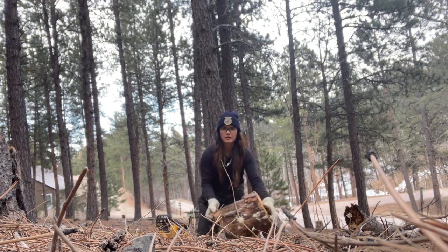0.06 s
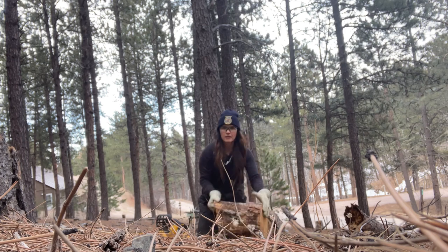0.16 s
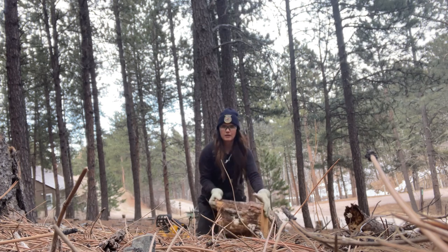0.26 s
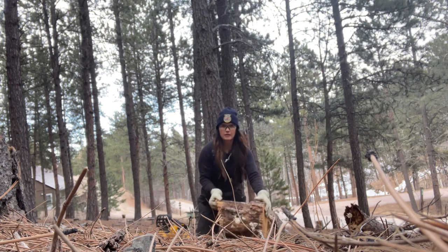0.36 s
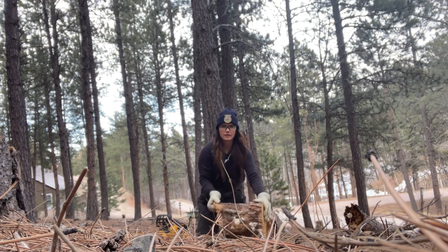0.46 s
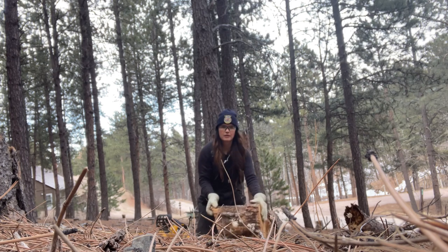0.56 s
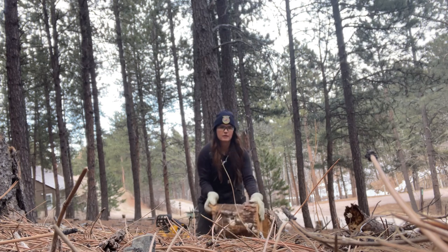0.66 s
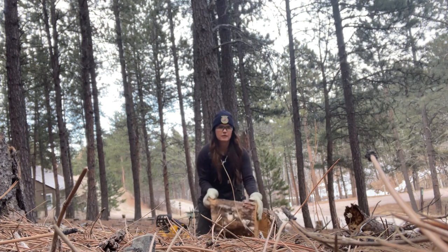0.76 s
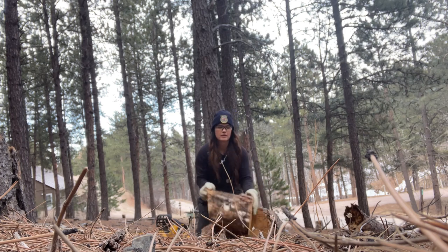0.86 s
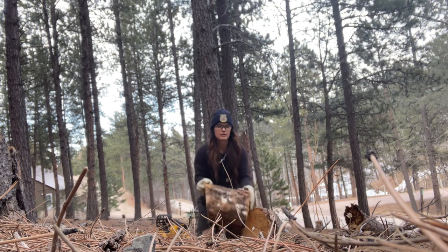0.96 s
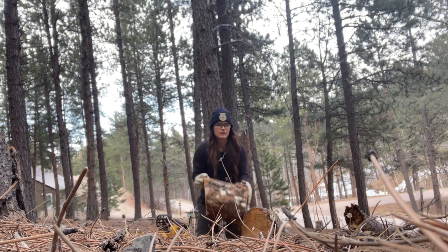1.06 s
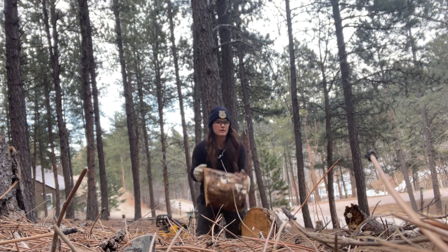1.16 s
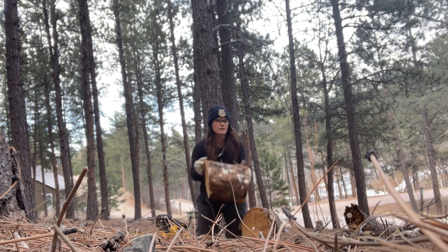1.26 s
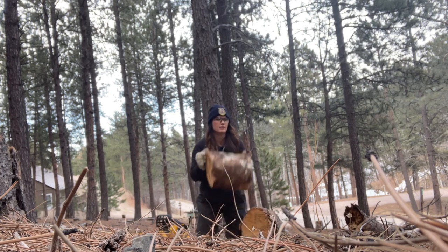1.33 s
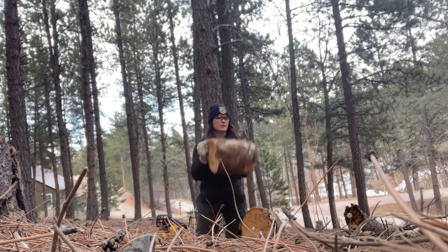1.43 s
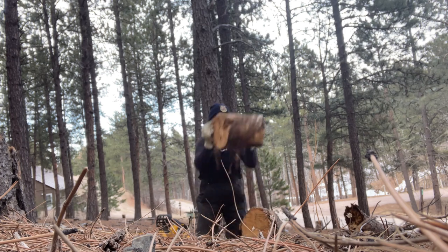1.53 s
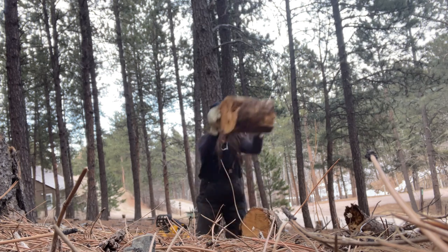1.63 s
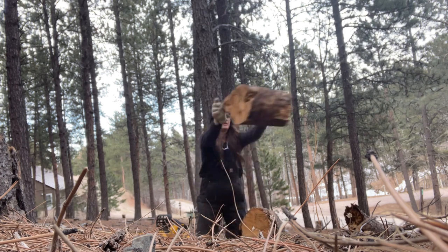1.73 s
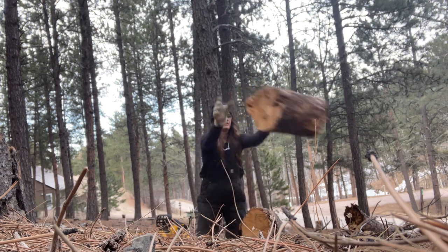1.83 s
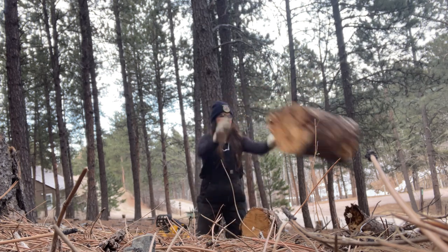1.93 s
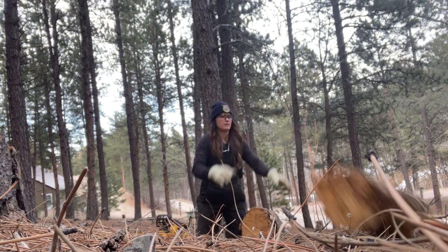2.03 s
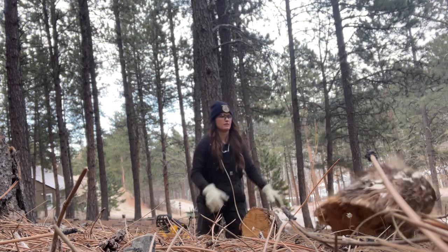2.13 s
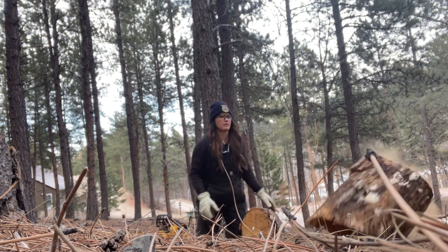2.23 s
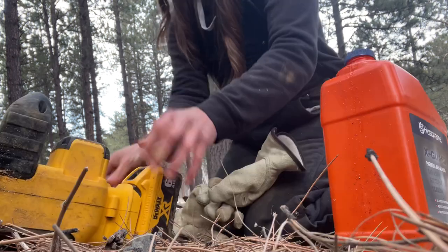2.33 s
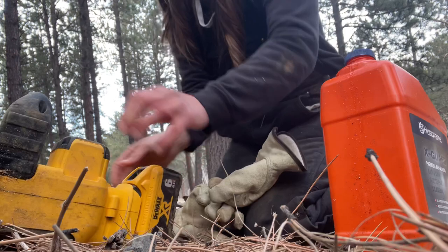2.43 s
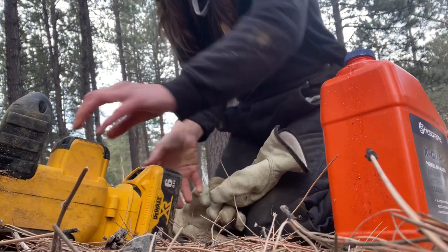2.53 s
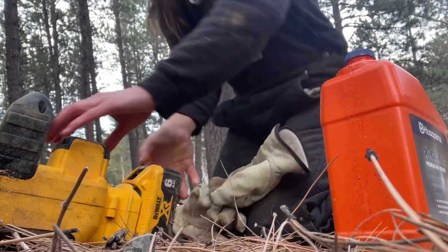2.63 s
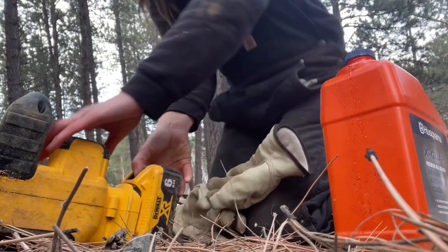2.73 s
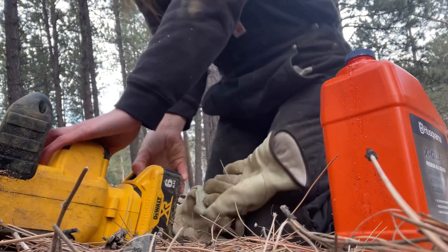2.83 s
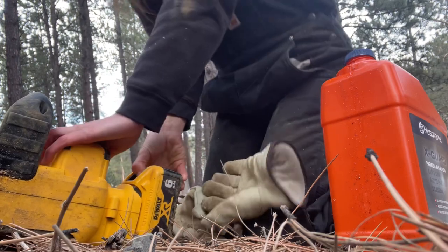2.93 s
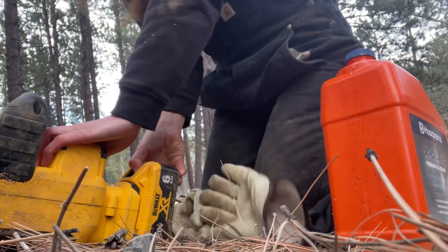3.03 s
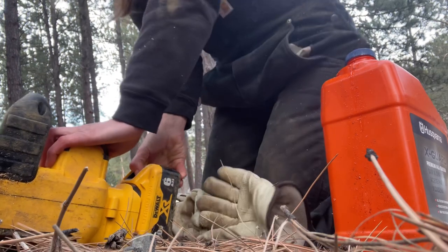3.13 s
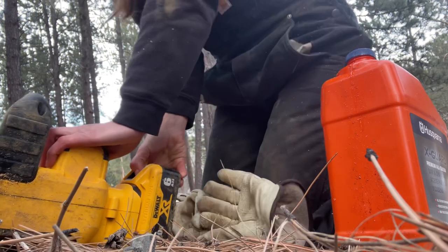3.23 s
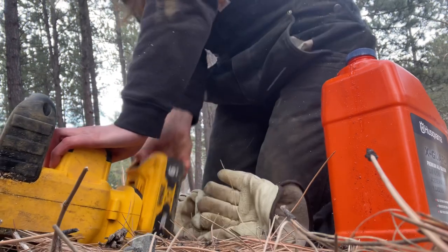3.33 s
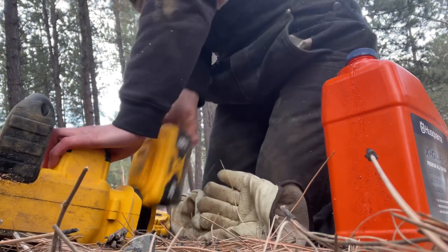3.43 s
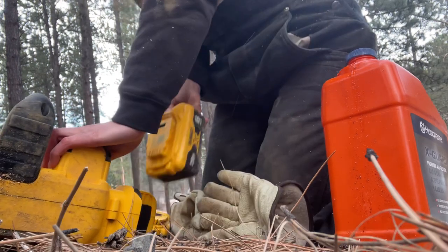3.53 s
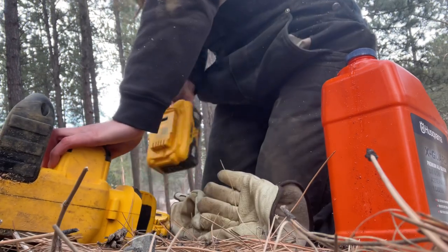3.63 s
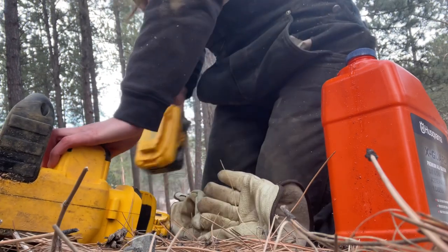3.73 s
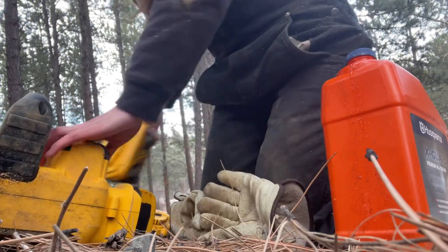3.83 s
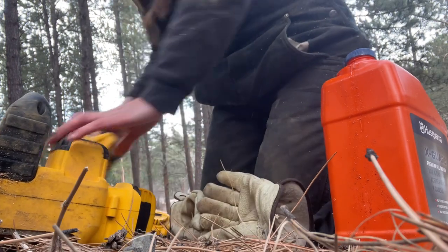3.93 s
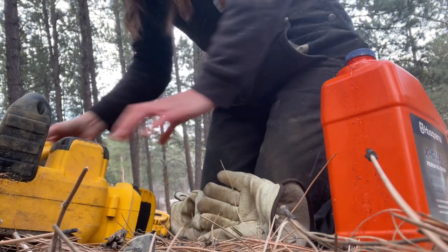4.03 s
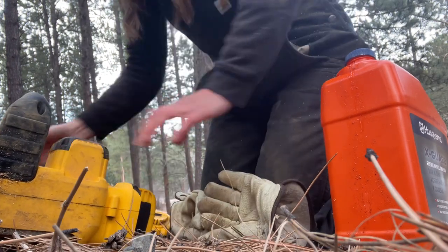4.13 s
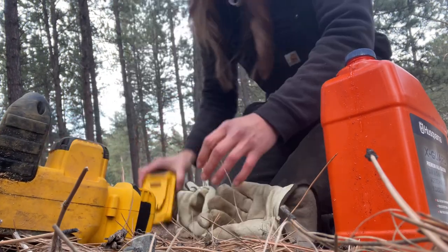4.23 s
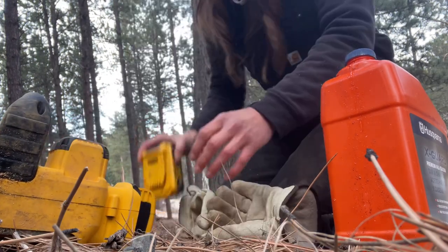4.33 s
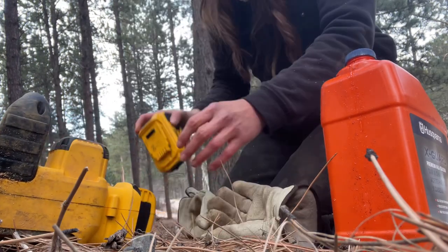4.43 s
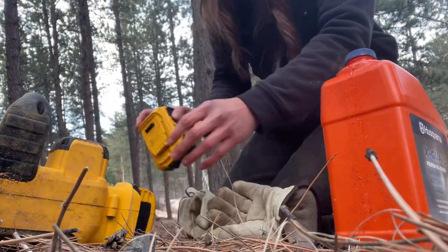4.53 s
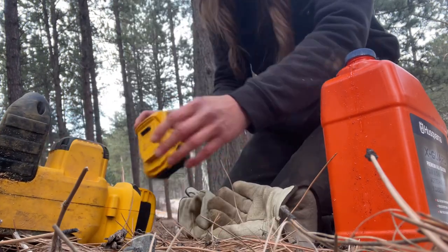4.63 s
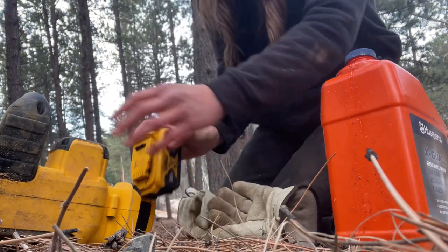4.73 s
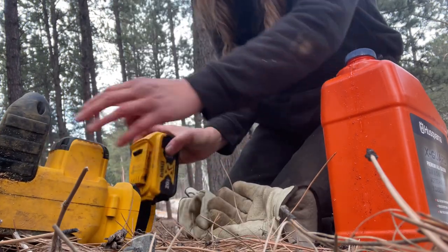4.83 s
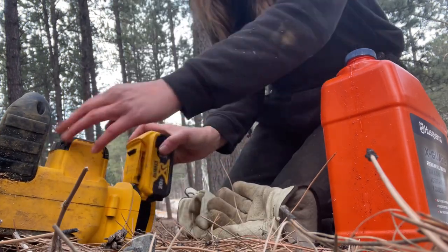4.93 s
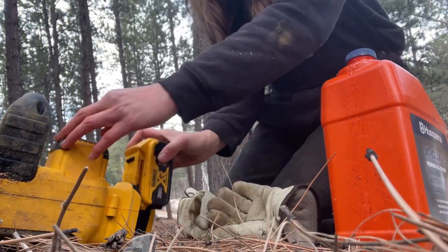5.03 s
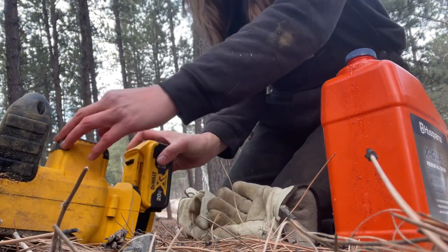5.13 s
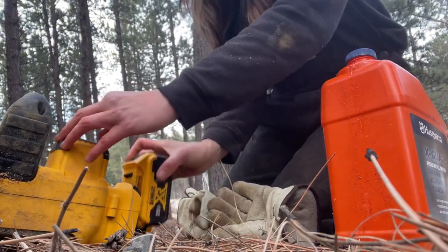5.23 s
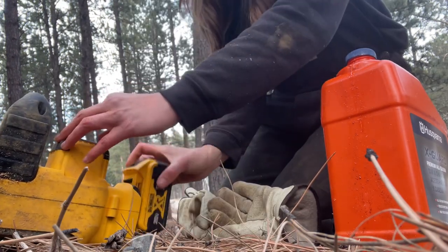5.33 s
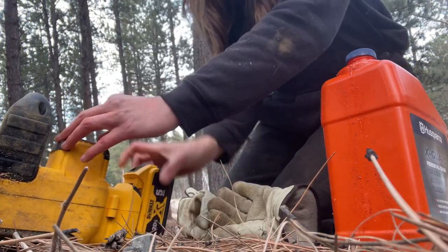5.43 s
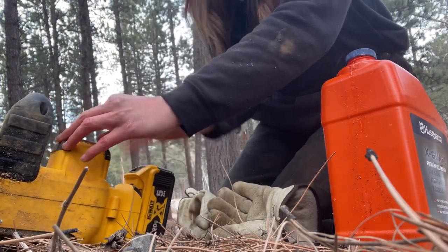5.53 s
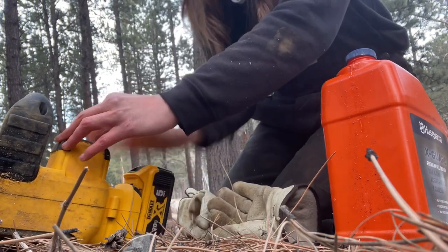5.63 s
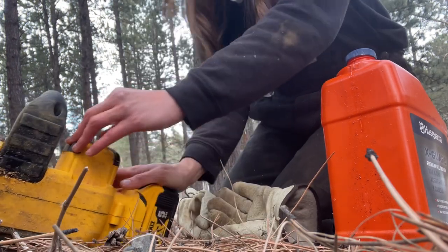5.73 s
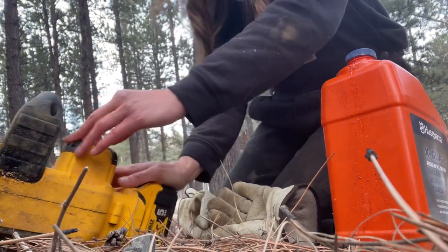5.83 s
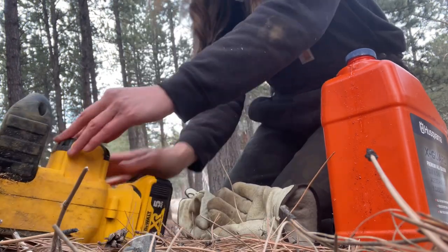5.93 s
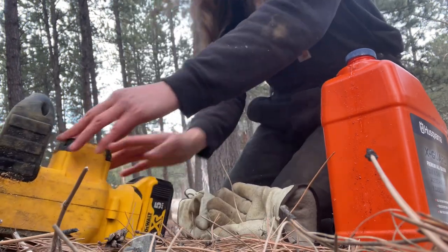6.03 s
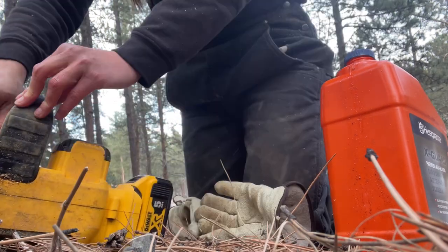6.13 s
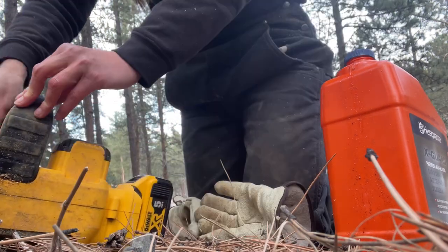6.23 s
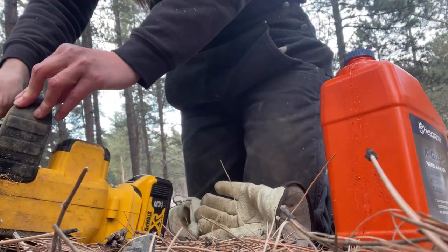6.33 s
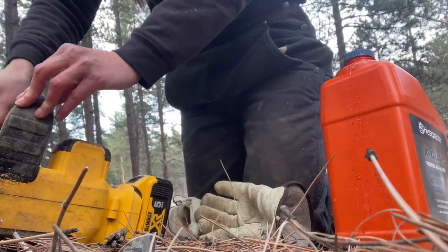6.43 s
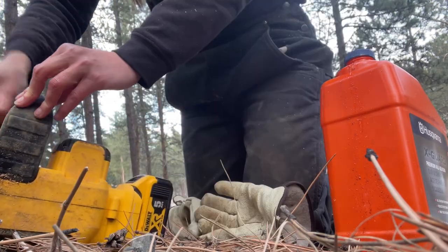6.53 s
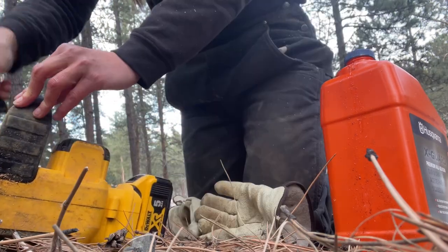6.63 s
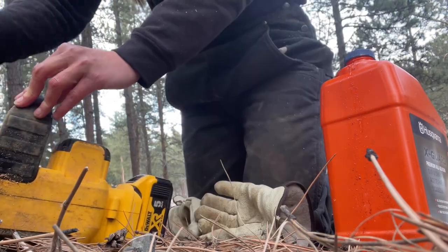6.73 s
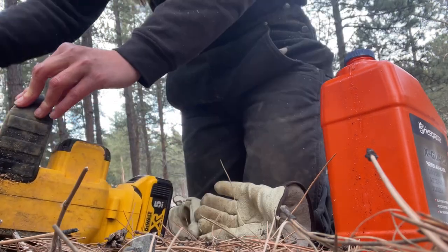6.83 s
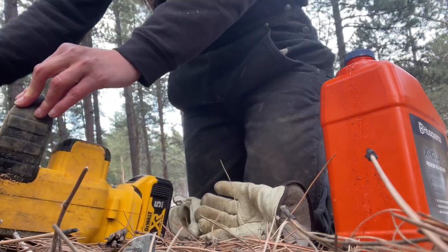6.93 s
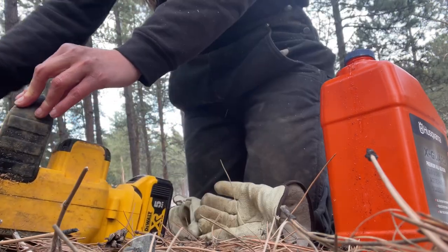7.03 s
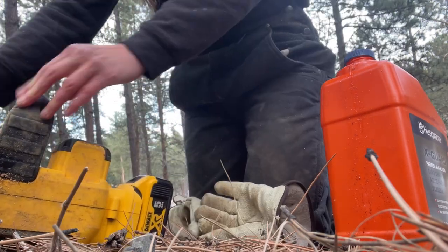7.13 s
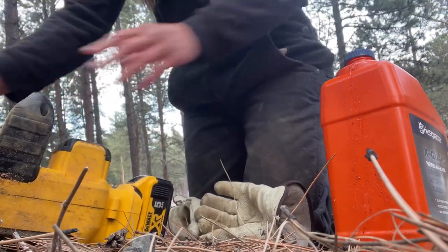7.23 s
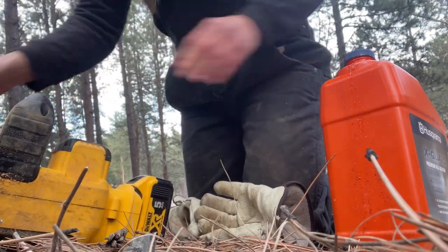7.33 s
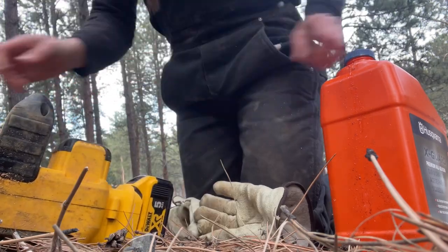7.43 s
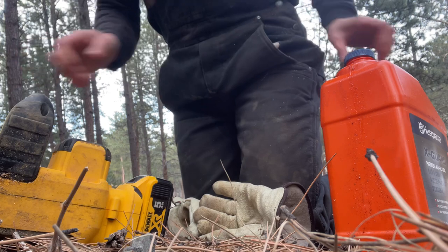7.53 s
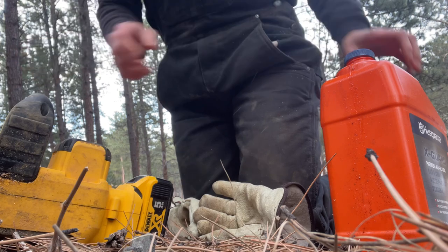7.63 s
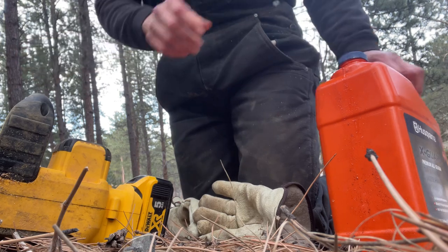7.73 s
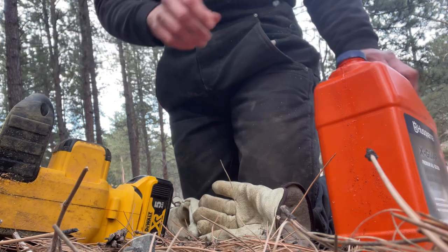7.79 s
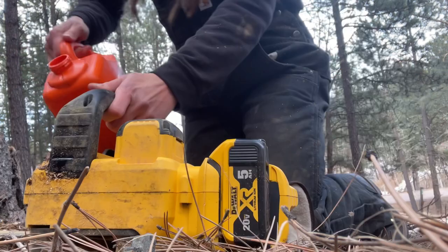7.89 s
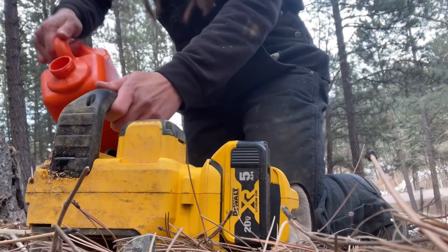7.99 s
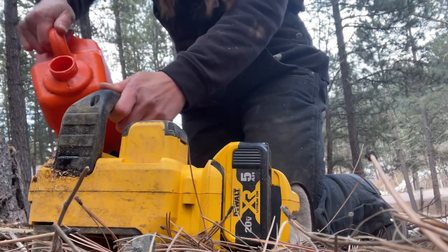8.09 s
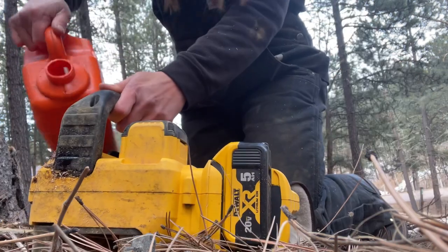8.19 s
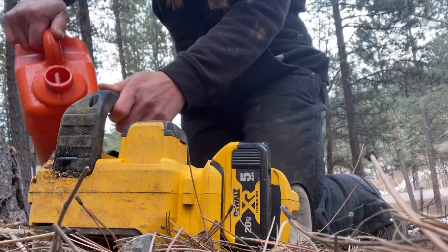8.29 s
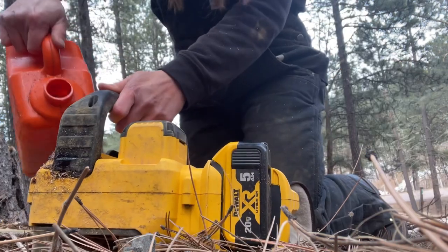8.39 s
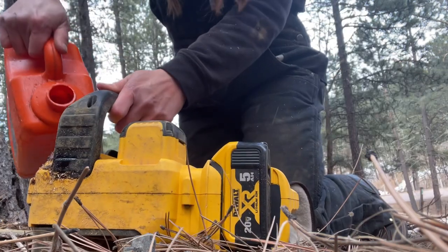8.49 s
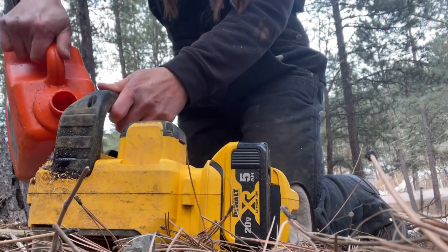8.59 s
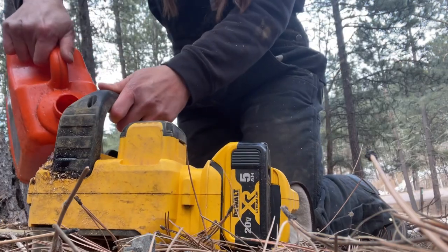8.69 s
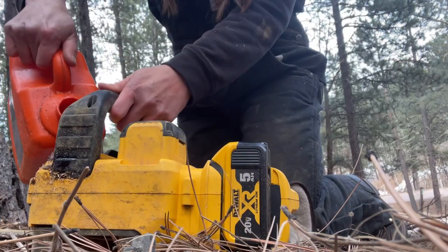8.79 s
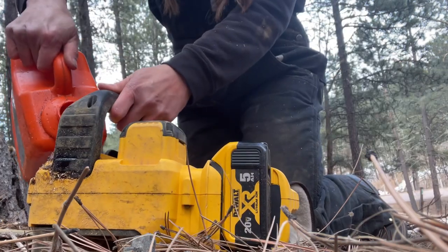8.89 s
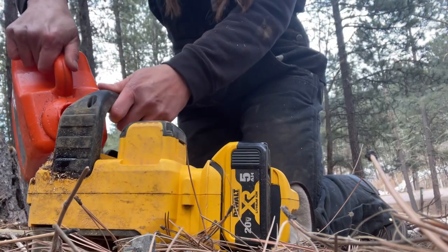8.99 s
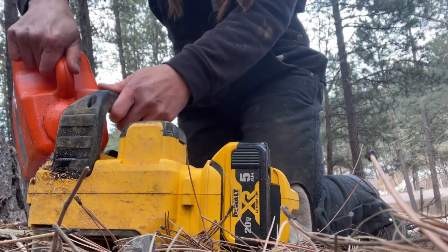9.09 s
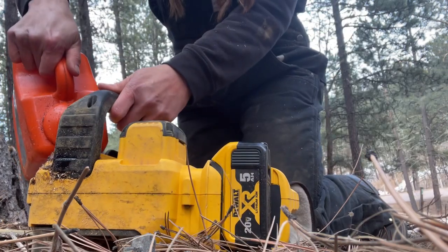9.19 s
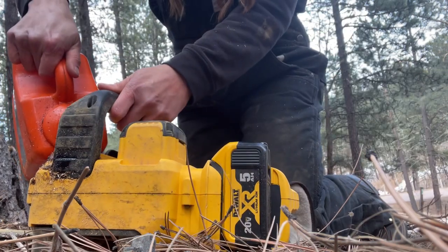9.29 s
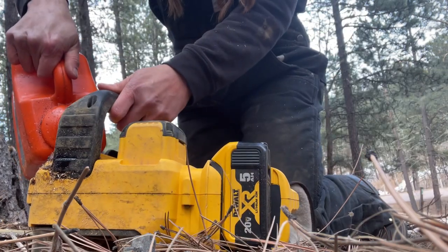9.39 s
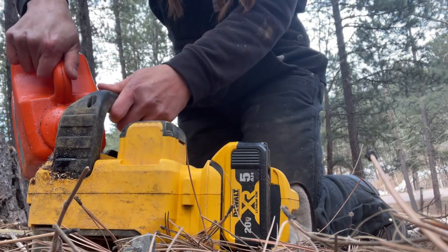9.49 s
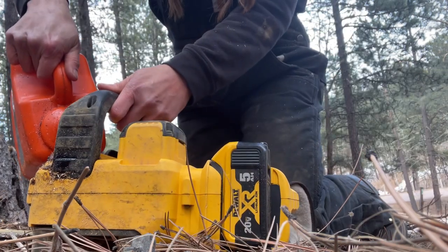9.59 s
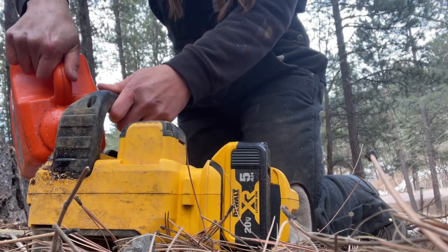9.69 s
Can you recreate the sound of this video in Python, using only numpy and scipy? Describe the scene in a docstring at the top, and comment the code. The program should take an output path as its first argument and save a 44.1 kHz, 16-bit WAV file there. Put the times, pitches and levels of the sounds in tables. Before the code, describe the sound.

A quiet wood with a low distant engine throbbing about twelve times a second and a faint hum. From 0 to 0.3 s a log round knocks and scuffs through dry needles; smaller knocks and rustles follow to 1.3 s, then near quiet. At 2.15 s it lands close by with a deep, loud thud and woody crack. The sound dips at 2.4 s. From 2.8 s plastic taps and needle rustle, with strong clacks at 3.05 and 3.4-3.5 s as a battery comes out. After a dip at 4.2 s, light handling, then knocks and rubbing at 5.0-5.5 s and the loudest sharp snap at 5.75 s. After 6.13 s, small bright cap clicks, a stronger one at 7.2 s, while the throb fades. After 7.87 s, a hollow jug bump at 8.0 s, then sparse faint taps until 9.7 s.

```python
"""Five shots in a pine wood, joined by dips to near silence; a far machine hums and a slow engine throbs behind.
First a log round is rolled, lifted and thrown on the needle bed: modal rings, clacks, thuds and noise rustle.
Then, close by, hands swap the battery of a plastic power saw, which taps, rings and rubs in its seat.
They twist the saw's cap, with brighter rings, while the throb falls away to a weaker one.
Last they lift an oil jug, whose hollow belly adds low modes to the taps."""
import sys
import numpy as np
from scipy import signal
from scipy.fft import rfft, irfft
from scipy.io import wavfile

SR = 44100
rng = np.random.default_rng(int(sys.argv[2]) if len(sys.argv) > 2 else 0)


def magnitude_from_level(level_db):
    """Linear magnitude for a level in decibels (20 dB per decade)."""
    exponent = np.asarray(level_db, float) / 20
    return 10 ** exponent


def materialize(psi):
    """Save the field psi as 16-bit PCM at rate SR to the path in sys.argv[1].

    A 1-D psi becomes a single channel; in a 2-D psi each row is a channel.
    """
    bounded = np.clip(np.atleast_2d(psi).T, -1, 1)
    quanta = np.round(bounded * 32767).astype(np.int16)
    wavfile.write(sys.argv[1], SR, quanta)


N = 429956

# Dips between shots. Each row: fall begins, bottom reached, rise begins, full again, all in seconds.
SHOT_FADES = [(2.325, 2.395, 2.41, 2.55), (4.05, 4.178, 4.183, 4.31), (6.02, 6.125, 6.135, 6.3),
              (7.85, 7.864, 7.875, 7.995)]
# Colour of needles, bark and sleeves. Each row: frequency in Hz, relative spectral density in dB.
RUSTLE_COLOUR = [(210, -32), (350, -5.5), (557, -9), (830, -7), (914, -8), (1280, -16.5), (2310, -17.5),
                 (3180, -23.5), (3920, -26.5), (4820, -18.5), (7550, -20.5), (12600, -21.5), (16000, -33)]
# Movements through needles, bark and sleeves. Each row: start in seconds, length in seconds, level in dB,
# weight (lows over that level) in dB, dryness (highs over that level) in dB.
MOVES = [(0, 0.15, -50.5, -6.5, -10.5), (0.167, 0.091, -46.5, 4, -8), (0.307, 0.12, -57.5, -22, -16),
         (0.477, 0.11, -62.5, 5, -2.5), (0.614, 0.063, -70.5, 10.5, -9), (0.738, .2, -67.5, 7.5, -2),
         (0.985, 0.01, -63, -2, -1), (1.03, 0.0096, -59, 0, -4.5), (1.12, 0.041, -91.5, 4, 19.5),
         (1.715, 0.082, -59, 1.5, -9.5), (2.115, 0.036, -70.5, 5.5, 0.5), (2.176, 0.036, -50.5, 6.5, 0.5),
         (2.239, 0.12, -66.5, 1, 1.5), (2.45, 0.26, -73, 6.5, -15), (2.608, 0.074, -68.5, 3, -2.5),
         (2.721, 0.2, -63, -2.5, 1.5), (2.837, 0.17, -62, 2.5, -1.5), (3.052, .13, -56, 2.5, -3),
         (3.21, 0.16, -60, 1.5, -4.5), (3.366, 0.12, -50.5, 2, -3.5), (3.541, 0.16, -61.5, 6, -11.5),
         (3.76, 0.18, -71.5, 4, -1.5), (3.965, 0.073, -63.5, -1, -2), (4.258, 0.041, -67, 5, 3.5),
         (4.331, 0.027, -58.5, 2.5, 4), (4.392, 0.055, -70, 9.5, -4), (5.048, 0.039, -65.5, 12.5, -8.5),
         (5.2, .05, -66, -3, -6), (5.279, 0.045, -53, 15, -8.5), (5.394, 0.025, -58, 2, -2),
         (5.514, 0.054, -59.5, 4.5, -6), (5.62, 0.25, -71.5, 6, -20.5), (5.785, .04, -56, -0.5, -14.5),
         (5.86, 0.17, -62, 1, -3.5), (6.301, .1, -77.5, 7, -10), (6.568, 0.033, -61, 2, -4),
         (6.681, 0.059, -66.5, 1, -20), (6.848, 0.04, -61.5, 2.5, -12), (6.957, 0.016, -69, 1.5, -28),
         (7.19, 0.045, -70, 3, 1), (7.253, .06, -65, 4, -15), (7.314, .09, -63, 3, -16.5),
         (7.766, .08, -75, 4.5, 1.5), (8.01, 0.022, -51.5, 0.5, -1), (8.081, 0.15, -61.5, -2, -2.5),
         (8.26, 0.093, -75, 4.5, -11.5), (8.379, 0.39, -79.5, -5, -5.5)]
RISE_DB_PER_S, FALL_DB_PER_S = 503, 348.5   # how a movement swells and settles
# Loose bits shaken by a tap, as lows, mids and highs. Each entry: level over the blow in dB.
SHAKE_DB = [-14, -24, -30]
# The same three ranges dying away. Each entry: 60 dB decay time in seconds.
SHAKE_T60_S = [0.094, 0.042, 0.021]
# Likeness of left and right in noise; below 0 counts as 0. Each row: frequency in Hz, likeness up to 1.
STEREO_LIKENESS = [(60, 0.58), (180, -0.31), (550, -0.59), (1650, 0.49), (4970, -0.73), (15000, 0.94)]
# Colour of the air among the trees. Each row: frequency in Hz, relative spectral density in dB.
WOOD_COLOUR = [(15, -36), (25, -7), (64, -3), (217, -6), (293, -4.5), (476, -13), (545, -18.5),
               (714, -19.5), (1230, -31.5), (2220, -30.5), (3080, -38), (6560, -39), (7310, -42.5),
               (11900, -42.5), (16000, -60)]
# Loudness of that air. Each row: time in seconds, level in dB.
WOOD_LEVEL = [(0, -49), (1, -60), (2.3, -64.5), (2.6, -59.5), (4.1, -58), (4.4, -59.5), (6, -61),
              (6.3, -63.5), (7.8, -60), (8.3, -65), (9.75, -66)]
HUM_HZ = 58.83
# Harmonics of the far machine. Each row: multiple of the fundamental, level in dB.
HUM_HARMONICS = [(1, -72), (2, -75.5), (3, -80.5), (4, -82), (5, -68.5), (6, -72.5), (7, -88.5), (9, -92)]
# Far engine in each shot. Each row: start in seconds, beats counted so far, beats per second.
ENGINE_BEATS = [(0, .44, 12.62), (2.4, 30.27, 12.53), (4.18, 52.33, 12.6), (6.13, 77.3, 11.95),
                (7.87, 99, 12.6)]
# Loudness of the engine. Each row: time in seconds, level in dB.
THROB_LEVEL = [(0, -49), (1, -47.5), (2.2, -47.5), (2.6, -46), (4, -49.5), (4.4, -48.5), (6, -49.5),
               (6.3, -49), (6.9, -54.5), (7.2, -63.5), (9.75, -66.5)]
# Taps on log, saw, cap and jug. Each row: start in seconds, ring level in dB,
# pitch where it rings most in Hz, clack over ring in dB, left over right in dB.
TAPS = [(.077, -40.5, 800, 1, -3), (0.156, -36, 504, -3, -3.5), (.181, -32.5, 724, -15, -4),
        (.204, -33, 880, -5, -6), (.231, -37, 750, 6, -7), (.472, -52.5, 980, 11.5, 2.5),
        (.529, -55, 656, 2, -7), (0.657, -51, 467, -3, -11), (0.76, -47, 415, -2, -4),
        (0.997, -50.5, 636, 8.5, -1), (1.036, -52, 930, 9, 3), (1.044, -58, 937, 9.5, 1.5),
        (1.236, -72.5, 890, 16.5, -5), (1.793, -49.5, 743, 13.5, -2), (2.153, -10.5, 404, -1, -7),
        (2.194, -22, 410, -5.5, -12), (2.219, -36, 414, 3, -5), (2.308, -39, 410, 3.5, -7),
        (2.811, -38.5, 1070, 14.5, -4.5), (2.858, -30, 650, -5, -4), (3.006, -51, 480, 17, -9),
        (3.056, -24, 371, -6, 1), (3.12, -43, 750, 1, -13.5), (3.148, -39.5, 650, -1, -4),
        (3.19, -40, 610, -6, -1), (3.224, -50, 643, 10.5, -13), (3.254, -59, 440, 13, -3),
        (3.346, -53, 898, 15, 1), (3.372, -28.5, 407, 10, 2), (3.412, -29, 940, -2, 2),
        (3.459, -20, 726, -17, 1), (3.497, -18.5, 764, -4.5, 0), (3.999, -55, 840, -4, 4),
        (4.268, -49.5, 773, 1.5, -7), (4.859, -51.5, 756, -2, -14), (5.022, -25.5, 530, -4.5, -1),
        (5.04, -36.5, 410, -21, 10), (5.134, -30, 420, -14, 2), (5.143, -13.5, 473, 1.5, 0.5),
        (5.15, -22.5, 408, -26, 1.5), (5.179, -36, 406, -15, 3), (5.259, -22, 640, -11.5, -1),
        (5.27, -34, 676, -7, -2), (5.292, -25.5, 410, -4.5, 1), (5.34, -26.5, 390, -7, 5),
        (5.457, -50.5, 1290, 1, -1), (5.499, -52.5, 1290, 15, 2), (5.508, -35, 560, -13, .5),
        (5.528, -35.5, 845, 4.5, 1), (5.564, -48, 864, 3, 5), (5.654, -63, 414, 19, -7),
        (5.735, -23.5, 536, 22, 1), (5.743, -13, 876, 8, -.5), (5.748, -12, 616, 19.5, -1),
        (5.758, -10, 1026, 14.5, -2), (5.761, -9.5, 401.3, -8, 8), (5.816, -32.5, 1058, 3, 1),
        (5.957, -47.5, 800, 8, 5), (6.027, -49.5, 840, -2.5, 5), (6.354, -53, 600, -10.5, -0.5),
        (6.544, -50.5, 630, 21, -0.5), (6.578, -43, 460, 17.5, 2), (6.698, -52, 1210, -0.5, 9),
        (6.734, -58.5, 572, -6.5, 16.5), (6.784, -58, 415, -4, 7), (6.843, -49, 1360, 4, -1),
        (6.857, -41, 1200, 6.5, 7), (6.88, -41, 547, 7, 6), (6.96, -47.5, 1240, 0, 6),
        (7.203, -47.5, 1257, 14, -13.5), (7.209, -28.5, 928, 0.5, 8.5), (7.227, -37, 581, -2, 6),
        (7.277, -40.5, 790, -5.5, 1), (7.702, -55.5, 940, 2, -9.5), (7.765, -56.5, 420, 11, -7.5),
        (8.001, -27, 840, 11, 0), (8.201, -43, 927, -1.5, 1), (8.315, -46.5, 967, 4, -1),
        (8.532, -57.5, 956, -0.5, -5.5), (8.687, -53.5, 435, 4, -8), (8.869, -74.5, 400, 19.5, -1),
        (9.089, -71.5, 429, 15.5, -9.5), (9.686, -58, 397, -1, -3.5)]
# When the hands leave log, saw, cap and jug. Each entry: time in seconds.
HANDLED_UNTIL_S = [2.4, 6.65, 7.5, 9.75]
# Modes of the log round. Each row: frequency in Hz, level in dB, 60 dB decay time in seconds.
LOG_MODES = [(400, 0.5, 0.023), (530, -9, 0.0087), (700, -0.5, 0.036), (756, -2, 0.027), (994.5, -1, 0.011)]
# Modes of the saw. Each row: frequency in Hz, level in dB, 60 dB decay time in seconds.
SAW_MODES = [(415, -2.5, 0.051), (506, -6, 0.067), (581, -2, 0.052), (650, 2.5, 0.034), (743, 3, 0.021),
             (878, 1, 0.035), (940, 4.5, 0.023), (1028, 1, 0.027), (1128, 0.5, 0.025), (1240, -10.5, 0.03),
             (1426, -2.5, .03), (1760, -15.5, 0.053)]
# Modes of the cap. Each row: frequency in Hz, level in dB, 60 dB decay time in seconds.
CAP_MODES = [(460, -23.5, 0.028), (581, 2.5, 0.1), (706, -8, 0.06), (957, -6, 0.051), (1040, -0.5, 0.035),
             (1215, 9, 0.04), (1290, 3, 0.054), (1507, 15, 0.014)]
# Modes of the jug. Each row: frequency in Hz, level in dB, 60 dB decay time in seconds.
JUG_MODES = [(420, -6.5, 0.02), (555, 1, 0.028), (840, -14.5, 0.1), (940, -3, 0.023), (1127, -13.5, 0.039),
             (1447, -6, 0.043)]
# Broad resonances of bark. Each row: frequency in Hz, width in Hz, level in dB.
BARK_CLACK = [(1582.5, 310, -4.5), (2076, 500, -0.5), (3730, 460, 2.5), (4238, 970, -2.5), (5175, 460, -11)]
# Broad resonances of the saw shell, also used for the cap. Each row: frequency in Hz, width in Hz, level in dB.
SHELL_CLACK = [(1632, 1000, -0.5), (2166, 490, 11.5), (2175, 370, 11.5), (2843, 150, -2.5), (3200, 210, -9),
               (4497, 1100, -11), (5530, 1100, -12.5)]
# Broad resonances of the jug. Each row: frequency in Hz, width in Hz, level in dB.
JUG_CLACK = [(1859, 160, 1), (2440, 600, 0.5), (2800, 223, 0.5), (3814, 1120, -16)]
# Bright crack over clack for log, saw, cap and jug. Each entry: level in dB.
CRACK_DB = [-9, -16.5, -22, -7.5]
# How differently the two microphone ports hear a near blow. Each row: frequency in Hz, level in dB.
PORT_DIFFERENCE = [(100, -20.5), (250, -11), (500, -10), (1000, -10), (2200, -4), (4000, -2.5), (6500, 6),
                   (9000, -2.5), (12000, -10)]
# Returns from ground and trunks. Each row: delay in seconds, level in dB.
ECHOES = [(.011, -18), (.023, -25.5)]
# Dry needles and grit that snap. Each row: start in seconds, level in dB, left over right in dB.
SNAPS = [(.136, -37.5, -2), (.269, -40.5, 4), (.468, -48, -2.5), (0.562, -50, -3), (.753, -46.5, -2),
         (.768, -50, -2), (0.939, -54, 0), (2.108, -47.5, -2), (2.118, -44.5, -4), (2.696, -46, -4),
         (2.761, -42.5, -7), (2.834, -39.5, -1), (2.889, -52, -5.5), (2.899, -41, -4.5), (2.942, -42.5, -3),
         (3.006, -31.5, -6), (4.314, -40, -2), (5.742, -8, -3.5), (5.816, -29, 3), (6.538, -27.5, .5),
         (7.789, -45.5, -4), (8.07, -43, 0), (8.759, -54.5, -3.5)]
# Dull blows on ground, log and jug. Each row: start in seconds, level in dB,
# pitch where it rings most in Hz, left over right in dB.
THUDS = [(.268, -29, 197, 2), (0.289, -41, 90, 3), (.563, -38, 207, 2), (0.994, -41.5, 258, 1),
         (2.152, -19, 400, 20.5), (2.157, -1.5, 246, 6), (2.165, -9, 89, -5), (2.179, -20.5, 200, 1.5),
         (2.194, -13.5, 400, -5), (2.2, -13.5, 179, 5), (2.219, -21.5, 119, 4.5), (2.316, -21, 149.6, 3.5),
         (3.061, -29.5, 234, 1), (3.375, -36, 250, 3.5), (3.384, -39.5, 70, 13), (3.469, -42.5, 80, 8),
         (5.76, -21, 240, -0.5), (6.586, -34, 187, 6.5), (7.77, -40, 170, 0), (7.79, -45.5, 140, 5.5),
         (8.001, -21.5, 228, 2.5), (8.003, -36, 95, 6), (8.03, -29, 195, 3.5), (9.551, -50, 230, 3)]
# Low modes of ground and log. Each row: frequency in Hz, level in dB, 60 dB decay time in seconds.
GROUND_MODES = [(60, 0, .12), (83, 0, .11), (110, -2, .07), (145, -1, .06), (178, -1, .055), (235, 0, .05),
                (300, -1, .04), (400, -2, .035)]
# Low modes of the hollow jug. Each row: frequency in Hz, level in dB, 60 dB decay time in seconds.
JUG_BELLY_MODES = [(95, -10, 0.18), (169, 0, 0.11), (228, 8, 0.14), (300, 10, 0.049)]
# The battery rubs in its seat. Each row: start in seconds, length in seconds, level in dB,
# surface as 0 for rails or 1 for shell.
STROKES = [(3.35, .155, -55.5, 0), (5.04, .05, -74, 1), (5.27, 0.061, -52, 1), (5.37, 0.082, -68, 1),
           (5.52, 0.044, -59.5, 1), (5.725, .01, -50, 0)]
# Resonances of rails, then of shell. Each row: frequency in Hz, width in Hz, level in dB.
SURFACES = [
    [(5260, 1570, 0)],
    [(1200, 25, 0.5), (1670, 33, -4), (2230, 200, -7.5), (3330, 50, -18.5), (4800, 41, -19.5),
     (5070, 74, -17.5)],
]
STROKE_EDGE_DB_PER_S = 1499.5   # a rub on plastic starts and stops sharply


def in_time(rows):
    """Read a (seconds, value) curve sample by sample."""
    return np.interp(np.arange(N) / SR, *np.transpose(rows))


def at_hz(points, hz):
    """Read a spectrum on a log frequency axis."""
    point_hz, value = np.transpose(points)
    return np.interp(np.log(hz), np.log(point_hz), value)


def rms_one(x):
    """Scale to rms 1."""
    return x / np.sqrt(np.mean(x ** 2) + 1e-20)


def drift(rate_hz):
    """Slow random wander of rms 1: twice-smoothed noise made at every 40th sample, then joined by lines."""
    r = np.exp(-80 * np.pi * rate_hz / SR)
    noise = rng.standard_normal(N // 40 + 2002)
    slow = signal.lfilter([1], [1, -2 * r, r * r], noise)[2000:]   # skip the filter's settling
    return np.interp(np.arange(N) / 40, np.arange(len(slow)), rms_one(slow))


def bands(spectrum, source, low_hz, patchy_db, patchy_hz):
    """Half-octave stereo bands of a noisy source, each coloured and flickering: yields (Hz, band)."""
    edges = low_hz * 2 ** np.arange(0, np.log2(17000 / low_hz), .5)
    for k, (low, high) in enumerate(zip(edges, edges[1:])):
        band_pass = signal.butter(2, [low, high], "band", fs=SR, output="sos")
        mid, side = signal.sosfilt(band_pass, source[k % 2])   # neighbours draw on separate noise
        hz = np.sqrt(low * high)
        alike = np.clip(at_hz(STEREO_LIKENESS, hz), 0, 1)
        stereo = np.sqrt(1 + alike) * mid + np.sqrt(1 - alike) * side * [[1], [-1]]
        yield hz, magnitude_from_level(at_hz(spectrum, hz) + patchy_db * drift(patchy_hz)) * stereo


def swell(start_s, length_s, rise_db_per_s, fall_db_per_s):
    """Gain of a gesture that rises, holds and settles along straight slopes in dB."""
    t = np.arange(N) / SR - start_s
    return magnitude_from_level(rise_db_per_s * np.minimum(t, 0) - fall_db_per_s * np.maximum(t - length_s, 0))


def stirring():
    """Gains of lows, mids and highs of the rustle: every movement, and what each tap shakes loose."""
    power = np.zeros((3, N))
    for s, length_s, db, weight_db, dry_db in MOVES:
        range_db = db + np.array([[weight_db], [0], [dry_db]])
        power += (swell(s, length_s, RISE_DB_PER_S, FALL_DB_PER_S) * magnitude_from_level(range_db)) ** 2
    s, db, hz, clack_db, pan_db = np.transpose(TAPS)
    # lows follow the ring, mids and highs the clack
    for k, blow_db in enumerate((db, db + clack_db, db + clack_db)):
        blows = np.zeros(N)
        blows[(s * SR).astype(int)] = magnitude_from_level(2 * (blow_db + SHAKE_DB[k]))
        decay = magnitude_from_level(-2 * 60 / (SHAKE_T60_S[k] * SR))
        power[k] += signal.lfilter([1], [1, -decay], blows + 1e-18)
    return np.sqrt(power)


def rustle():
    """Dense snaps of uneven size over friction noise; a heavier push adds lows, dry needles add highs."""
    ticks = rng.random((2, 1, N)) < 1500 * magnitude_from_level(5 * drift(25)) / SR   # about 1500 per second, in flurries
    sizes = magnitude_from_level(3.6 * np.minimum(rng.exponential(1, (2, 1, N)), 5))   # few are large
    source = rng.standard_normal((2, 2, N)) * (1 + 2.8 * ticks * sizes)
    parts = np.zeros((3, 2, N))   # lows to 900 Hz, mids to 4300 Hz, highs
    for hz, band in bands(RUSTLE_COLOUR, source, low_hz=321.5, patchy_db=2.5, patchy_hz=90):
        parts[int(hz > 900) + int(hz > 4300)] += band
    # now and then a needle breaks outright
    breaks = (rng.random(N) < 45 / SR) * rng.exponential(1, N)
    flare = signal.lfilter([1], [1, -np.exp(-1 / (0.00094 * SR))], breaks + 1e-18)
    parts[2] *= 1 + 0.76 * flare
    return sum(gain * rms_one(part) for part, gain in zip(parts, stirring()))


def wood():
    """Rumble and hush of the forest: coloured noise whose bands flicker gently."""
    white = rng.standard_normal((2, 2, N))
    air = sum(band for hz, band in bands(WOOD_COLOUR, white, low_hz=27.0, patchy_db=1.0, patchy_hz=6.4))
    return magnitude_from_level(in_time(WOOD_LEVEL)) * rms_one(air)


def hum():
    """Harmonics of a far machine, each wavering in level and phase in the air."""
    phase = 2 * np.pi * HUM_HZ * np.arange(N) / SR
    out = np.zeros(N)
    for multiple, db in HUM_HARMONICS:
        swell_db, turn = 3.5 * drift(7), .6 * drift(4)
        out += np.sqrt(2) * magnitude_from_level(db + swell_db) * np.sin(multiple * phase + turn)
    return out


def engine():
    """One low puff per beat, a short sine under a bell curve, of uneven strength and phase."""
    start_s, count, rate = np.transpose(ENGINE_BEATS)
    clock = np.arange(N) / SR
    shot = np.searchsorted(start_s, clock, side="right") - 1
    beats = count[shot] + rate[shot] * (clock - start_s[shot])
    since = (beats + .5) % 1 - .5   # beats from the nearest beat
    luck = rng.standard_normal((200, 2))[np.floor(beats + .5).astype(int)]
    t = since / 12.6 + .006   # seconds, at the usual 12.6 beats per second
    puff = np.exp(-(t / 0.0085) ** 2) * np.sin(2 * np.pi * 84 * t + 0.41 + .5 * luck[:, 1])
    return magnitude_from_level(in_time(THROB_LEVEL) + 2.4 * luck[:, 0]) * puff


def add(out, s, sound, pan_db):
    """Place a sound at a time, panned."""
    at = int(s * SR)
    sound = sound[:N - at]
    out[:, at:at + len(sound)] += sound * magnitude_from_level([[pan_db / 2], [-pan_db / 2]])


def struck(modes, best_hz, octaves, least_db, spread_db, contact_s):
    """One ring of peak 1 per blow: modes near the blow's own pitch speak loudest."""
    hz, db, t60 = np.transpose(modes)
    t = np.arange(SR // 5) / SR
    rings = np.sin(2 * np.pi * hz[:, None] * t) * magnitude_from_level(-60 * t / t60[:, None])
    away = np.log2(hz / np.asarray(best_hz)[:, None]) / octaves
    chance = rng.standard_normal((len(away), len(hz)))
    blows = magnitude_from_level(db + np.maximum(-20 * away ** 2, least_db) + spread_db * chance) @ rings
    blows = blows * (1 - np.exp(-t / contact_s))   # contact builds up over a moment
    return blows / np.abs(blows).max(axis=1, keepdims=True)


def burst(count, low_hz, high_hz, fast_s, tail_db, tail_s):
    """Rows of band-passed noise that dies fast, then more slowly."""
    t = np.arange(SR // 10) / SR
    decay = (1 - np.exp(-t / 0.0002)) * (np.exp(-t / fast_s) + magnitude_from_level(tail_db) * np.exp(-t / tail_s))
    noise = rng.standard_normal((count, len(t))) * decay
    return signal.sosfilt(signal.butter(2, [low_hz, high_hz], "band", fs=SR, output="sos"), noise)


def resonances(x, peaks):
    """Parallel two-pole resonances of alternating sign."""
    out = 0
    for k, (hz, width_hz, db) in enumerate(peaks):
        r = np.exp(-np.pi * width_hz / SR)
        poles = [2, -4 * r * np.cos(2 * np.pi * hz / SR), 2 * r * r]
        out = out + (-1) ** k * magnitude_from_level(db) * signal.lfilter([1 - r * r, 0, r * r - 1], poles, x)
    return out


def taps():
    """Each tap rings the thing in hand, clacks in its broad resonances and carries a short bright crack."""
    out, rows = np.zeros((2, N)), np.array(TAPS)
    thing = np.searchsorted(HANDLED_UNTIL_S, rows[:, 0])
    things = [(LOG_MODES, BARK_CLACK), (SAW_MODES, SHELL_CLACK), (CAP_MODES, SHELL_CLACK), (JUG_MODES, JUG_CLACK)]
    for k, (modes, peaks) in enumerate(things):
        own = rows[thing == k]
        rings = struck(modes, own[:, 2], octaves=.45, least_db=-14, spread_db=2.5, contact_s=.0009)
        clacks = resonances(burst(len(own), 900, 7000, fast_s=0.0026, tail_db=-21, tail_s=0.011), peaks)
        cracks = burst(len(own), 6000, 14000, fast_s=0.002, tail_db=-23.5, tail_s=0.0036)
        for (s, db, hz, clack_db, pan_db), ring, clack, crack in zip(own, rings, clacks, cracks):
            add(out, s, magnitude_from_level(db) * ring, pan_db)
            add(out, s, magnitude_from_level(db + clack_db) * (clack + magnitude_from_level(CRACK_DB[k]) * crack), pan_db)
    return out


def ports(x):
    """A near source reaches the two microphone ports with opposite shifts of phase."""
    hz = np.maximum(np.fft.rfftfreq(N, 1 / SR), 1)
    side = irfft(1j * magnitude_from_level(at_hz(PORT_DIFFERENCE, hz)) * rfft(x.mean(axis=0)), N)
    return x + side * [[-1], [1]]


def echoes(x):
    """Two dull returns from ground and trunks; the second swaps sides and turns one upside down."""
    out = np.zeros_like(x)
    dull = signal.sosfilt(signal.butter(1, 3000, fs=SR, output="sos"), x)
    for k, (s, db) in enumerate(ECHOES):
        lag, sign = int(s * SR), (-1) ** k
        out[:, lag:] += magnitude_from_level(db) * dull[::sign, :-lag] * [[1], [sign]]
    return out


def snaps():
    """A snap of needle or grit is a bright crack with no body behind it."""
    out = np.zeros((2, N))
    cracks = burst(len(SNAPS), 3500, 15000, fast_s=.0012, tail_db=-24, tail_s=0.005)
    for (s, db, pan_db), crack in zip(SNAPS, cracks):
        add(out, s, magnitude_from_level(db) * crack, pan_db)
    return out


def thuds():
    """Heavy soft contacts ring only the low modes: of ground and log first, of the hollow jug last."""
    out, rows = np.zeros((2, N)), np.array(THUDS)
    on_jug = rows[:, 0] > HANDLED_UNTIL_S[2]   # once the cap is let go
    for modes, own in ((GROUND_MODES, rows[~on_jug]), (JUG_BELLY_MODES, rows[on_jug])):
        rings = struck(modes, own[:, 2], octaves=.6, least_db=-26, spread_db=2, contact_s=.0012)
        for (s, db, hz, pan_db), ring in zip(own, rings):
            add(out, s, magnitude_from_level(db) * ring, pan_db)
    return out


def rasp():
    """Battery rubbing in its seat: friction noise coloured by the surface that is rubbed."""
    out = np.zeros((2, N))
    for s, length_s, db, surface in STROKES:
        friction = rng.standard_normal((2, N)) + 1.6 * rng.standard_normal(N)   # partly shared by both sides
        tone = rms_one(resonances(friction, SURFACES[surface]))
        gesture = swell(s, length_s, STROKE_EDGE_DB_PER_S, STROKE_EDGE_DB_PER_S)
        out += magnitude_from_level(db + 2.5 * drift(60)) * gesture * tone
    return out


def scene():
    """Near blows with their echoes, rustle and rubbing, and the far background a little to the left."""
    blows = taps() + snaps() + thuds()
    far = engine() + hum()
    return ports(blows) + echoes(blows) + rustle() + rasp() + wood() + far * magnitude_from_level([[.8], [-.8]])


def roll_off(x):
    """The treble ends steeply here."""
    return signal.sosfilt(signal.butter(12, 16510, fs=SR, output="sos"), x)


def record(dry):
    """Small microphones dip near 7.5 kHz; peaks are rounded, lowest bass and top are cut; shots fade in and out."""
    t = np.arange(N) / SR
    fade = np.ones(N)
    for corners in SHOT_FADES:
        fade = fade * np.interp(t, corners, [1, 0, 0, 1]) ** 1.4
    b, a = signal.iirnotch(7500, 3.0, fs=SR)
    x = .25 * dry + .75 * signal.lfilter(b, a, dry)
    x = 1.205 * np.tanh(x / 1.181)
    x = signal.sosfilt(signal.butter(4, 44, "high", fs=SR, output="sos"), x)
    x = signal.sosfilt(signal.butter(4, 14500, fs=SR, output="sos"), x)
    mix = np.clip(x, -.95, .95) * (fade + magnitude_from_level(-38.5))   # a faint trace stays between shots
    return roll_off(mix)


dry = scene()
out = record(dry)
materialize(out)
```